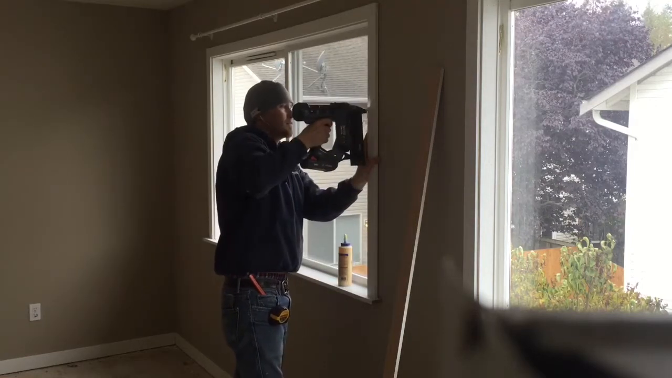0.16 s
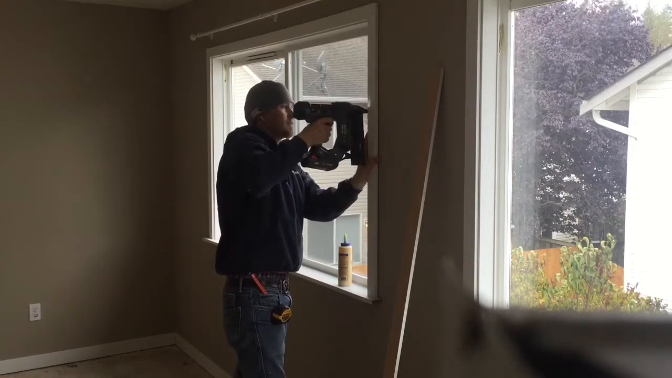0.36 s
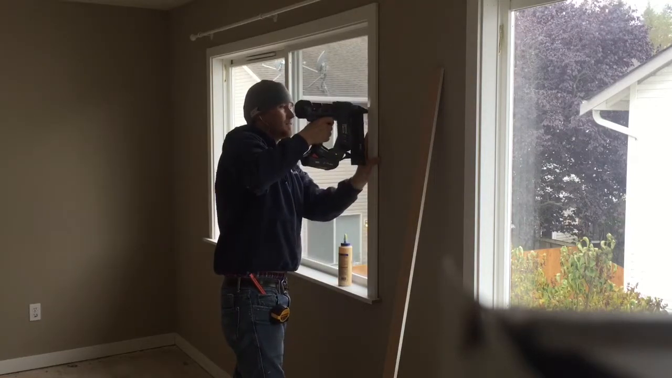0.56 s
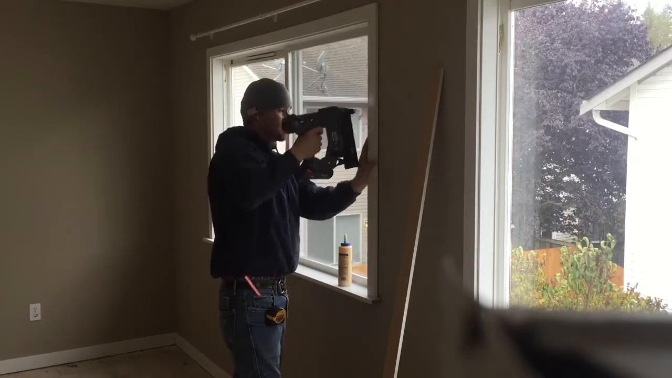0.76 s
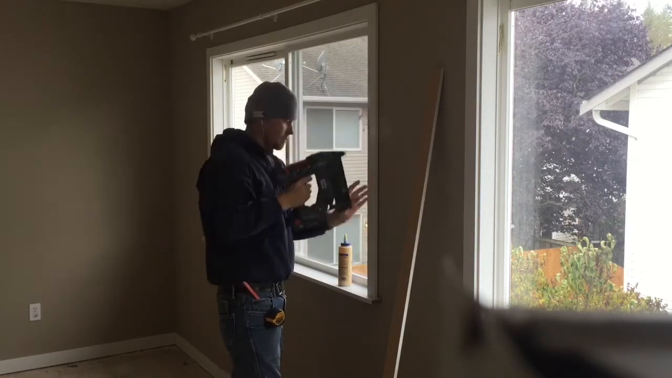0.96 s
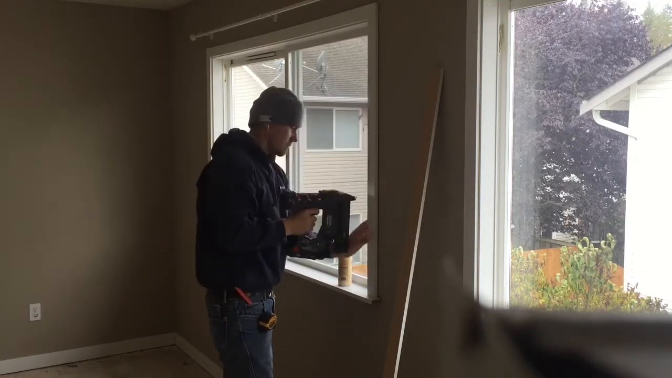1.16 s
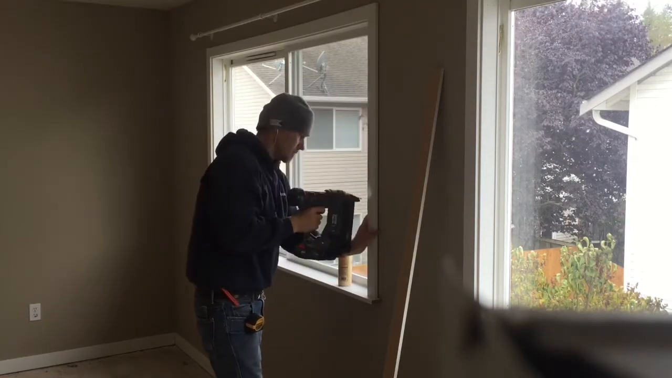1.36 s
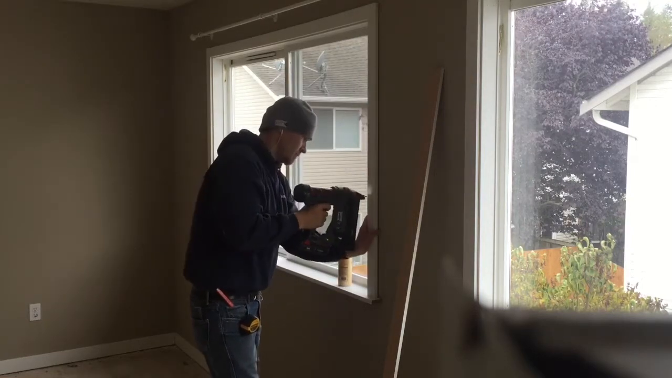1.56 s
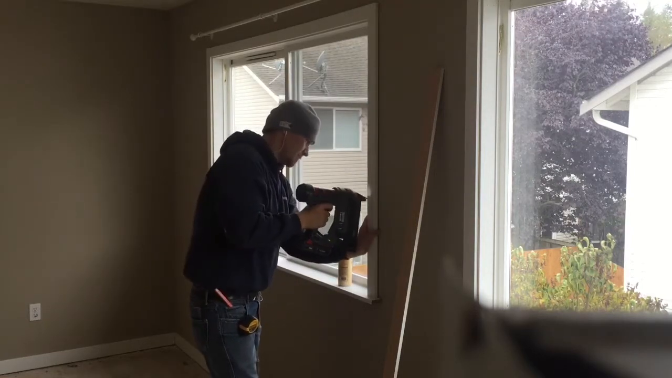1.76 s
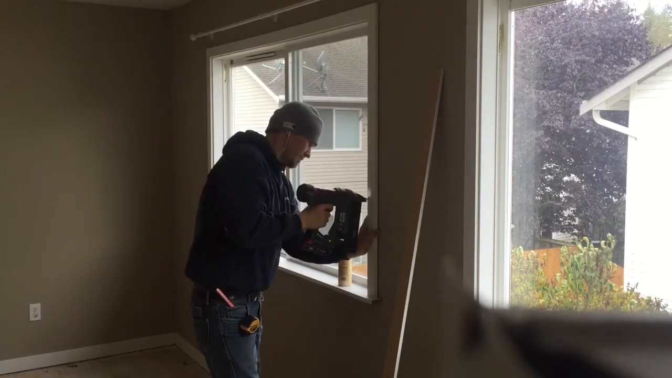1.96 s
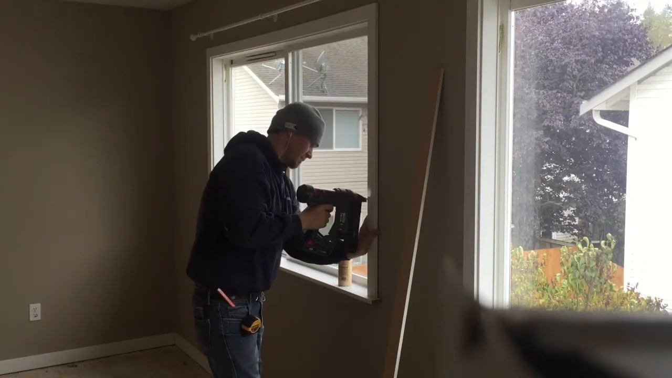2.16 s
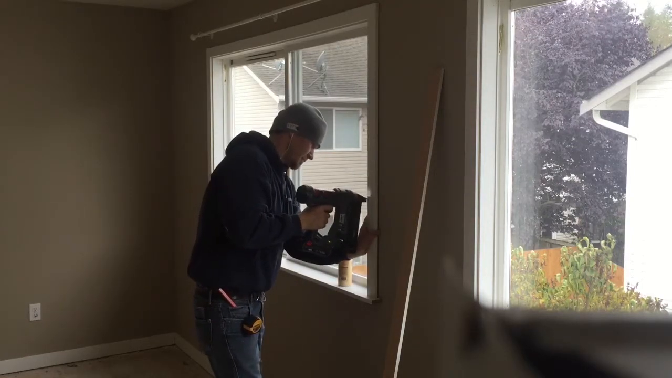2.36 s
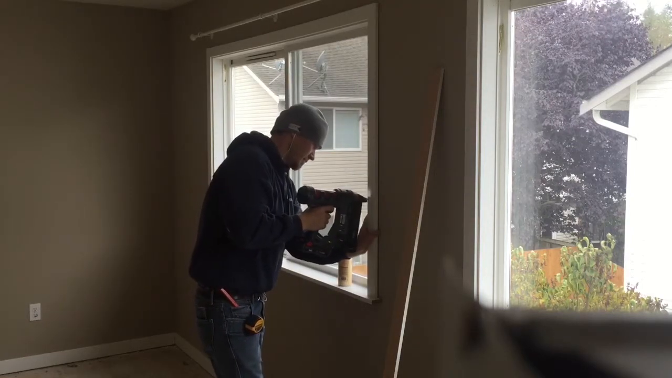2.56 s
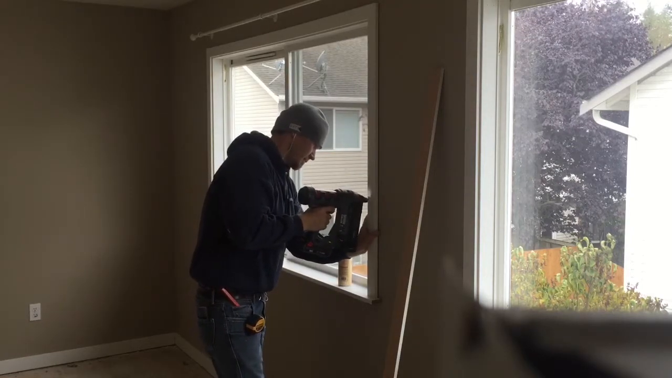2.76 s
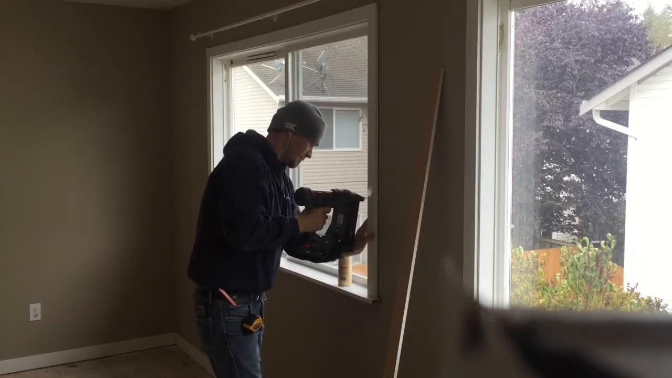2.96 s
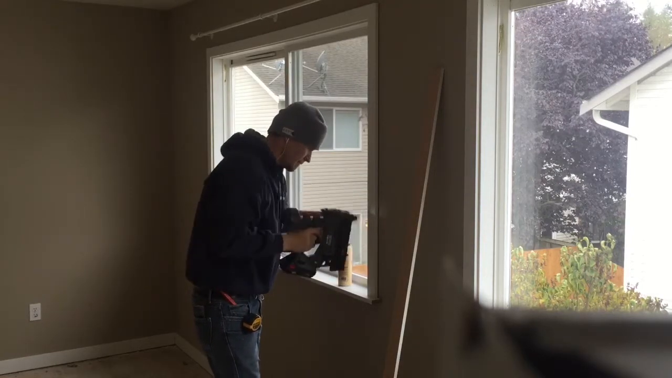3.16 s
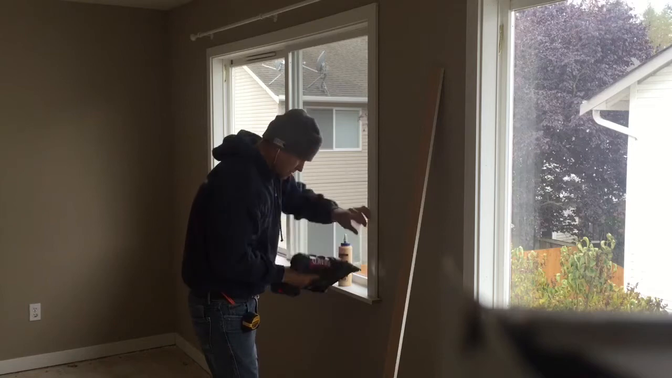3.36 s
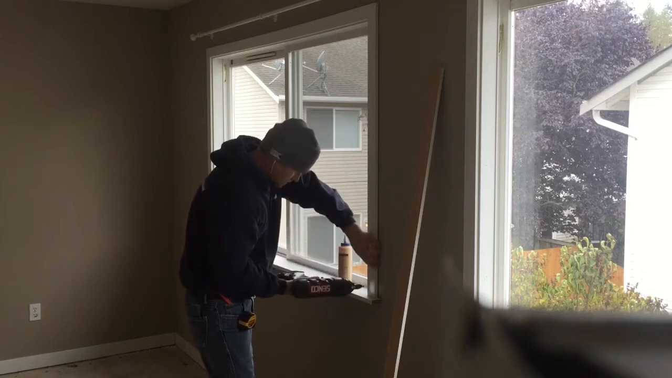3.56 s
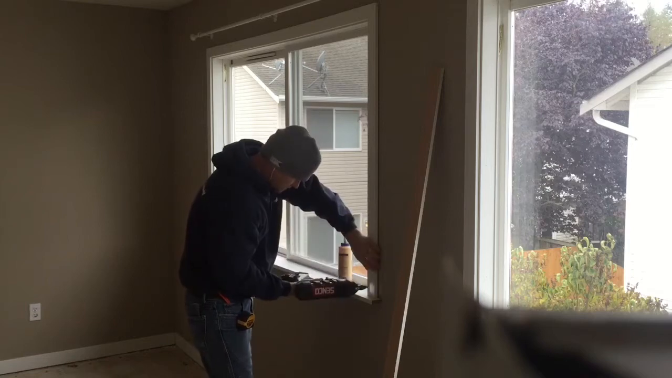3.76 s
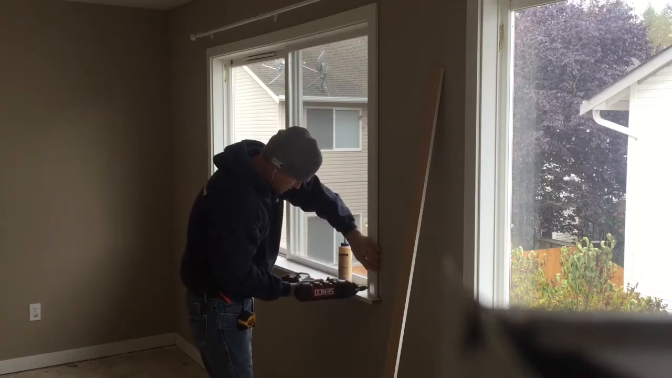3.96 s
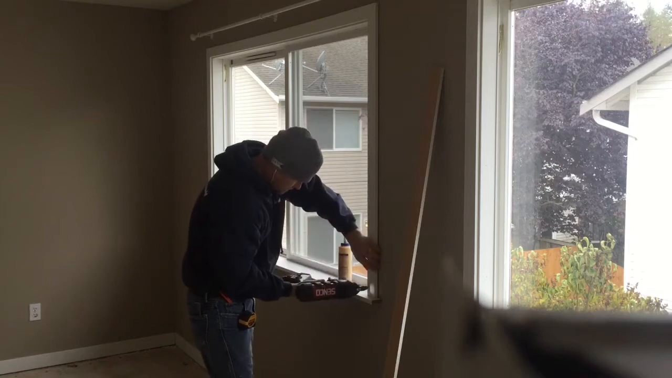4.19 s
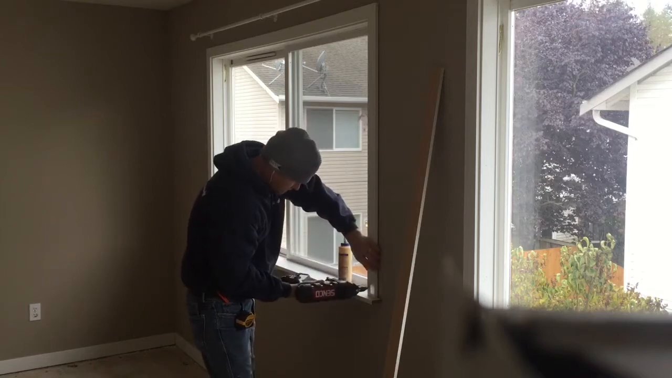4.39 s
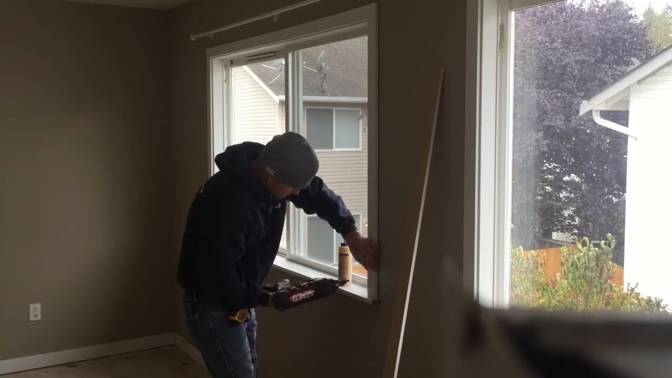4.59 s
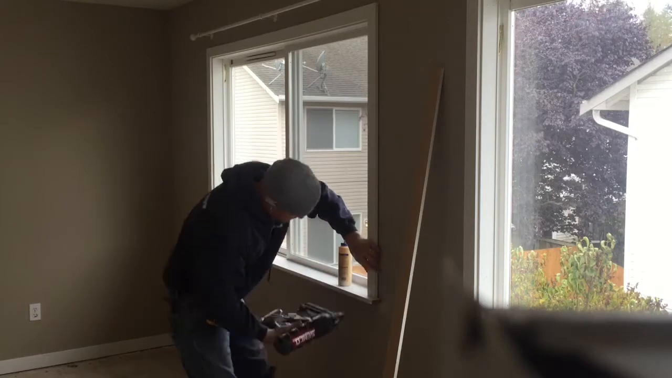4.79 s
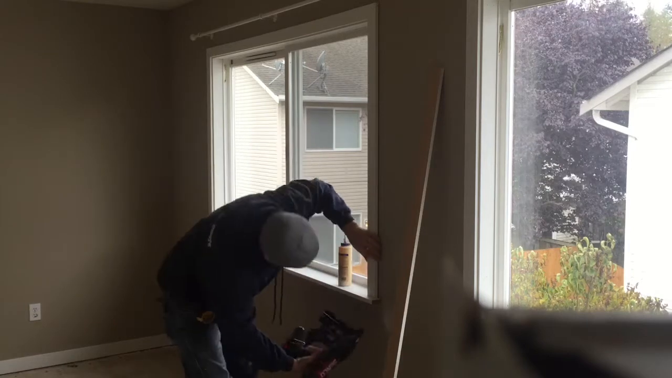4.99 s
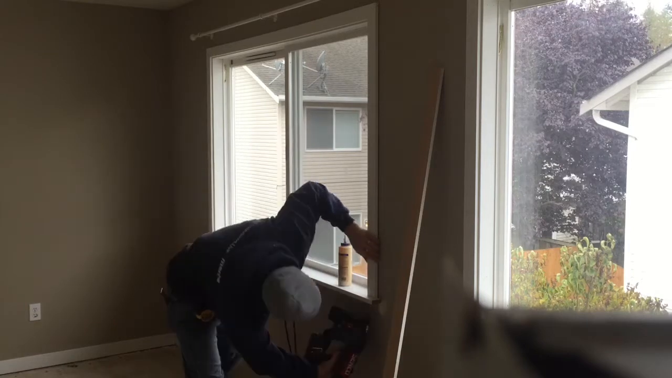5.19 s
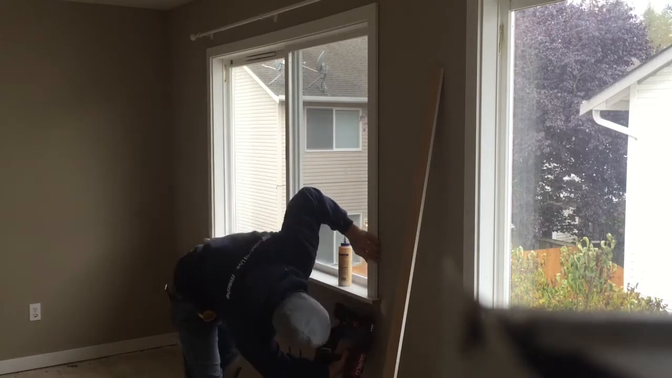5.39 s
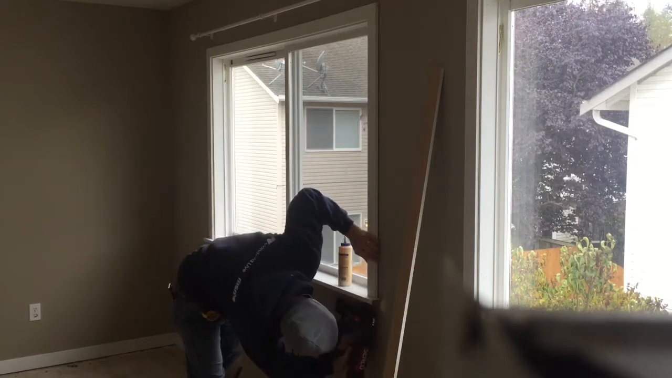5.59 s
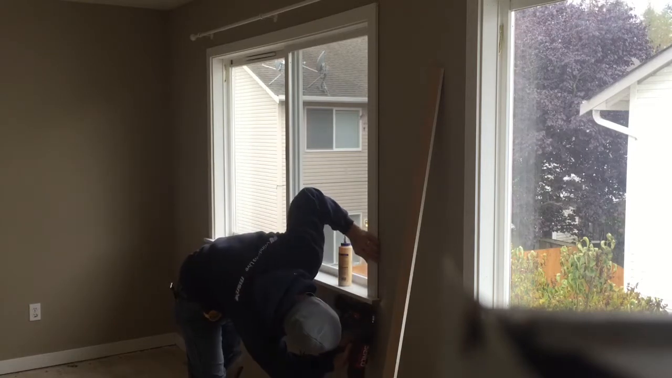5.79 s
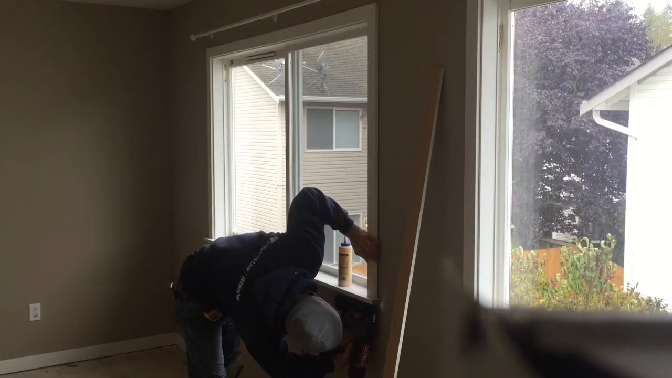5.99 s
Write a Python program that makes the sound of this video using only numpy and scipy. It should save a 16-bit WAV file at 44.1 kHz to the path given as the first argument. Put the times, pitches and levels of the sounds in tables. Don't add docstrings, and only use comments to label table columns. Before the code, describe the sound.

A cordless nailer fires three loud, clipped shots into window trim in an empty echoing room, with faint traffic and hum outside.

```python
import sys
import numpy as np
from scipy import signal
from scipy.fft import rfft, irfft, next_fast_len
from scipy.io import wavfile
from scipy.ndimage import map_coordinates

SR = 44100
rng = np.random.default_rng(int(sys.argv[2]) if len(sys.argv) > 2 else 0)


def voltage_ratio(decibels):
    exponent = np.asarray(decibels, float) / 20
    return 10 ** exponent


def generate_wav(sig):
    pcm = np.round(np.clip(np.atleast_2d(sig).T, -1, 1) * 32767).astype(np.int16)
    wavfile.write(sys.argv[1], SR, pcm)


N = 266364
T = np.arange(2 * SR) / SR
STANDING = rng.standard_normal(700)

# frequency [Hz], density [dB per Hz].
STREET_SPECTRUM = [(180, -26), (300, -7.5), (450, -5), (620, -0.5), (760, -4), (950, -0.5), (1400, -7),
                   (2100, -12), (2600, -19.5), (3700, -22.5), (5700, -32), (7500, -43.5), (9500, -49),
                   (15500, -70)]
# frequency [Hz], density [dB per Hz].
RUMBLE_SPECTRUM = [(15, -64.5), (30, -26.5), (55, -18.5), (75, -4), (100, -6.5), (150, -8), (220, 0.5),
                   (330, -15.5), (500, -58.5)]
# time [s], rumble level [dB].
LORRY_LEVELS = [
    (0, -51.5),
    (1.5, -51),
    (2.8, -49),
    (4.2, -48.5),
    (5.4, -44.5),
    (6.04, -51),
]
# frequency [Hz], level [dB].
DRONE_PARTIALS = [(85, -54), (119, -55), (167, -57), (253, -47.5), (291, -56), (409, -58), (538, -54),
                  (635, -55)]

# frequency [Hz], t60 [s].
ROOM_T60 = [(60, .6), (160, 0.89), (420, 1.45), (1000, 1.835), (1800, 1.32), (2900, 1.32), (6000, 1.053),
            (10000, 0.66), (15000, 0.47)]

# start [s], level [dB], length [s], brightness [dB per octave].
RUSTLES = [
    (3.515, -74, .06, 5.5),
    (3.619, -75.5, .07, 4.5),
    (3.796, -73, .04, 2),
    (5.02, -51.5, .03, 4),
    (5.032, -41, 0.086, -8),
    (5.781, -63.5, 0.053, -6),
]
# frequency [Hz], density [dB per Hz].
CLOTH_SPECTRUM = [(1500, -8), (3000, -0.5), (6000, 0.5), (9000, 0), (12000, -1.5), (15500, -0.5)]
# start [s], level [dB], low, mid and high ring [dB].
BRAD_TOUCHES = [
    (3.797, -62, -5.5, -4, 5.5),
    (5.776, -54, -7, 6, -1),
    (5.799, -57.5, 0, -9, -8),
]
# frequency [Hz], t60 [s].
BRAD_MODES = [(8550, .04), (11900, .018), (15300, .018)]

# time [s], peak [dB].
RETURNS = [
    (0.7708, 1),
    (3.0634, 0),
    (3.0705, -5),
    (4.556, -3.5),
    (4.5721, -1),
]
# frequency [Hz], density [dB per Hz].
SLAP_SPECTRUM = [(600, -31), (1500, 3), (2500, -3.5), (4000, -0.5), (7000, -4.5), (10000, -4.5),
                 (14000, -7.5), (16000, -13)]
# frequency [Hz], level [dB], t60 [s].
STOP_MODES = [(2350, -4, .04), (3710, -8, .025), (5950, -9, .02), (9730, -14, .02), (13400, -14, .02)]

# blow time [s], peak [dB], bass [dB], treble [dB], release click [dB].
SHOTS_FIRED = [
    (0.62, 2, 3, 1, -14),
    (2.911, 3, -1, 1.1, -12),
    (4.404, 3, 3, 0, -15),
]
# frequency [Hz], density [dB per Hz].
CLICK_SPECTRUM = [(600, -29), (1300, -4), (2400, -5.5), (3700, -0.5), (5500, -4), (7000, -10), (9500, -10),
                  (15500, -19)]
# frequency [Hz], level [dB], t60 [s].
LATCH_MODES = [(2770, -6, .026), (4590, -8, .025), (5660, -10, .025), (7000, -14, .025), (9170, -19, .025)]
# frequency [Hz], level [dB], t60 [s].
LATCH_BOUNCE_MODES = [(9000, -5, .012), (4000, -12, .012)]
# frequency [Hz], density [dB per Hz].
BANG_SPECTRUM = [(35, -33), (80, -16), (200, -4.5), (430, -9.5), (700, -2.5), (1050, 0), (1400, -3.5),
                 (1900, -7.5), (2800, -11), (4200, -10.5), (6300, -13), (7500, -18), (10500, -19),
                 (15500, -24)]
# frequency [Hz], level [dB], t60 [s].
BLADE_MODES = [(5200, -12, .02), (6400, -6, .035), (8300, -9, .025), (12300, -15, .02)]
# frequency [Hz], level [dB], t60 [s].
WALL_MODES = [(50, -35.5, 0.7), (83, -21, 0.33), (153.6, -14.5, 0.2), (220, -21.5, 0.63), (737, -6, 0.068),
              (836, -21, 0.14), (925, -18.5, 0.26), (1021, -19.5, .25), (1115, -15, 0.26),
              (1325, -8.5, 0.075), (1522, -18.5, 0.14)]

# centre [Hz], width [Hz], depth [dB].
MIC_DIPS_HZ_DB = [(4950, 250, -3.5), (10420, 500, -4.5)]
# frequency [Hz], density [dB per Hz].
HISS_SPECTRUM = [(2000, 1.5), (10000, -2.5), (15500, -3.5)]


def unit(x):
    return x / np.sqrt(np.mean(x ** 2) + 1e-20)


def along(points, hz):
    f, v = np.transpose(points)
    return np.interp(np.log(hz + 1), np.log(f + 1), v)


def add(out, start_s, x):
    part = out[round(start_s * SR):][:len(x)]
    part += x[:len(part)]


def wobble(rate_hz):
    knots = rng.standard_normal(int(N * rate_hz / SR) + 4)
    return map_coordinates(knots, [np.arange(N) * rate_hz / SR])


def noise(spectrum, size, comb_db=0):
    m = next_fast_len(size)
    hz = np.fft.rfftfreq(m, 1 / SR)
    comb = map_coordinates(STANDING, [hz / 35]) * (hz > 320) if comb_db else 0
    gain = voltage_ratio(along(spectrum, hz) + comb_db * comb)
    return unit(irfft(rfft(rng.standard_normal(m)) * gain, m)[:size])


def burst(spectrum, rise_s, t60_s):
    return noise(spectrum, len(T)) * (1 - np.exp(-T / rise_s)) * voltage_ratio(-60 * T / t60_s)


def ring(modes, rise_s):
    t = T[:SR]
    rung = 0
    for hz, db, t60_s in modes:
        rung = rung + voltage_ratio(db + rng.normal(0, 3.3) - 60 * t / t60_s) * np.sin(2 * np.pi * hz * t)
    return np.pad(rung * (1 - np.exp(-t / rise_s)), (0, len(T) - SR))


def room(spectrum, onset_s, early_db):
    hz, t, z = signal.stft(noise(spectrum, len(T), comb_db=1.5), SR, nperseg=512)
    t60_s = along(ROOM_T60, hz)[:, None]
    decay = voltage_ratio(-60 * t / t60_s) + voltage_ratio(early_db - 60 * t / 0.18)
    tail = signal.istft(z * decay, SR, nperseg=512)[1][:len(T)]
    return tail * (1 - np.exp(-(T / onset_s) ** 2))


def street():
    t = np.arange(N) / SR
    wash = voltage_ratio(-34.5 + 0.29 * wobble(3)) * noise(STREET_SPECTRUM, N, comb_db=1.5)
    rumble_db = np.interp(t, *np.transpose(LORRY_LEVELS)) + 2.0 * wobble(4)
    rumble = voltage_ratio(rumble_db) * noise(RUMBLE_SPECTRUM, N)
    turns_s = t + np.cumsum(.006 * wobble(4)) / SR
    hum = 0
    for hz, db in DRONE_PARTIALS:
        hum = hum + voltage_ratio(db + 2 + 2.6 * wobble(8)) * np.sin(2 * np.pi * hz * turns_s)
    return wash + rumble + hum


def rustle(length_s, bright_db):
    colour = [(hz, db + bright_db * np.log2(hz / 8000)) for hz, db in CLOTH_SPECTRUM]
    puff = noise(colour, len(T)) * T / length_s * 4 * np.exp(1 - T / length_s * 2.7)
    return puff + voltage_ratio(-1) * room(colour, .5 * length_s, early_db=1.5)


def brad_touch(levels_db):
    modes = [(hz, db, t60_s) for (hz, t60_s), db in zip(BRAD_MODES, levels_db)]
    return ring(modes, .0025) + voltage_ratio(-14.5) * room(CLOTH_SPECTRUM, .004, early_db=5.5)


def handling():
    out = np.zeros(N)
    for start_s, db, length_s, bright_db in RUSTLES:
        add(out, start_s, voltage_ratio(db) * rustle(length_s, bright_db))
    for start_s, db, *levels_db in BRAD_TOUCHES:
        add(out, start_s, voltage_ratio(db + 7) * brad_touch(levels_db))
    return out


def return_slap():
    spray = voltage_ratio(3) * burst(SLAP_SPECTRUM, .002, .022) + voltage_ratio(-1) * burst(CLOTH_SPECTRUM, .002, .02)
    return spray + ring(STOP_MODES, .0015) + voltage_ratio(-13) * room(SLAP_SPECTRUM, 0.008, early_db=-12.5)


def release_click():
    click = voltage_ratio(3) * burst(CLICK_SPECTRUM, .0015, .02) + voltage_ratio(-1) * ring(LATCH_MODES, .001)
    return click + voltage_ratio(-12) * room(CLICK_SPECTRUM, 0.0084, early_db=-6.5)


def blow(bass_db, treble_db):
    tilt_hz = np.log([150, 600, 2000, 8000])
    tilt_db = [bass_db, 0, 0, treble_db]
    colour = [(hz, db + np.interp(np.log(hz), tilt_hz, tilt_db)) for hz, db in BANG_SPECTRUM]
    crack = voltage_ratio(-4) * burst(SLAP_SPECTRUM, .0016, .03) + ring(BLADE_MODES, .001)
    fizz = voltage_ratio(4 * treble_db - 9) * burst(CLOTH_SPECTRUM, .0016, .025)
    thud = voltage_ratio(-4.0) * burst(colour, 0.0012, 0.031) + ring(WALL_MODES, 0.0043)
    return crack + fizz + thud + voltage_ratio(-12.0) * room(colour, 0.0048, early_db=1.5)


def nailer():
    release_lead_s, rush_lead_s, latch_bounce_s = .0422, .0058, .008
    out = np.zeros(N)
    for blow_s, db, bass_db, treble_db, click_db in SHOTS_FIRED:
        release_s = blow_s - release_lead_s
        add(out, release_s, voltage_ratio(click_db - 0.5) * release_click())
        add(out, release_s + latch_bounce_s, voltage_ratio(click_db) * ring(LATCH_BOUNCE_MODES, .0006))
        add(out, blow_s - rush_lead_s, voltage_ratio(db - 16.5) * burst(SLAP_SPECTRUM, .002, .1))
        add(out, blow_s - .0018, voltage_ratio(db) * blow(bass_db, treble_db))
    for slap_s, db in RETURNS:
        add(out, slap_s - .0006, voltage_ratio(db - 7.5) * return_slap())
    return out


def scene():
    return (street() + handling() + nailer())[None]


def roll_off(x):
    return signal.sosfilt(signal.butter(12, 15690, fs=SR, output="sos"), x)


def record(dry):
    m = next_fast_len(N + SR // 4)
    hz = np.fft.rfftfreq(m, 1 / SR)
    dips_db = sum(db * np.exp(-((hz - centre_hz) / width_hz) ** 2) for centre_hz, width_hz, db in MIC_DIPS_HZ_DB)
    top_hz, edge_hz = 15720, 50
    lowpass = (1 - np.tanh((hz - top_hz) / edge_hz)) / 2
    hissing = dry + voltage_ratio(-78.0) * noise(HISS_SPECTRUM, N)
    band = irfft(rfft(hissing, m) * voltage_ratio(dips_db) * lowpass, m)[:, :N]
    clipped = band / (1 + np.abs(band) ** 8) ** (1 / 8)
    return roll_off(clipped)


dry = scene()
out = record(dry)
generate_wav(out)
```